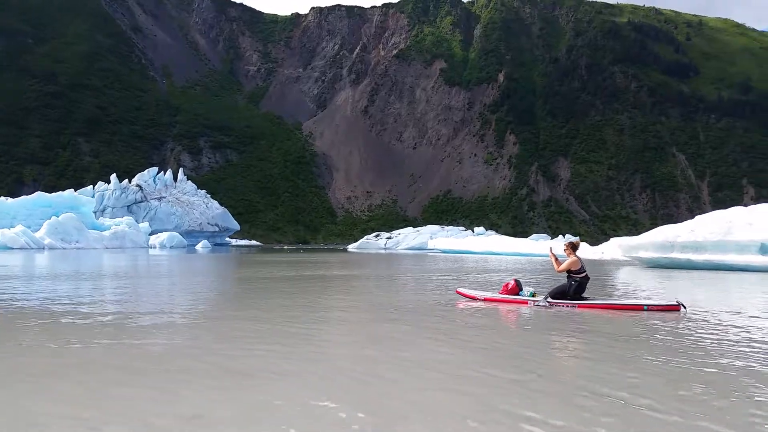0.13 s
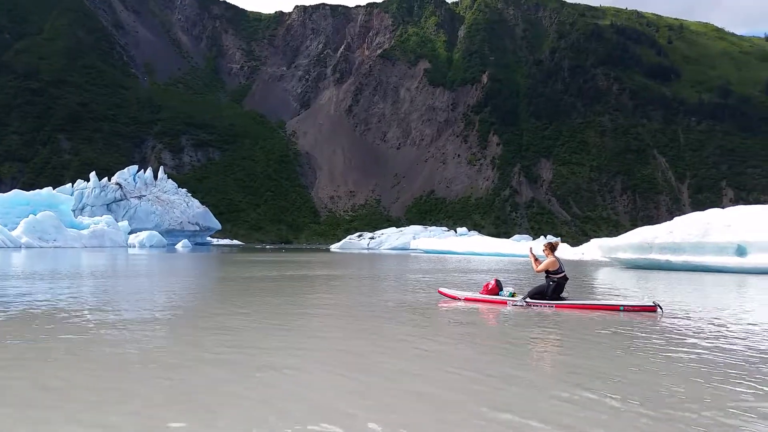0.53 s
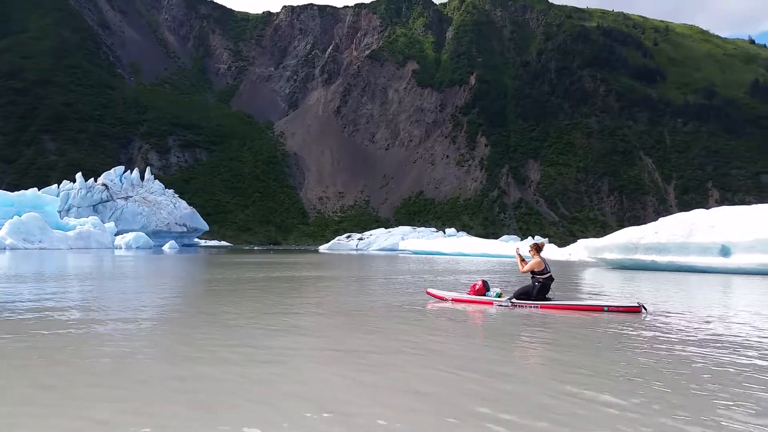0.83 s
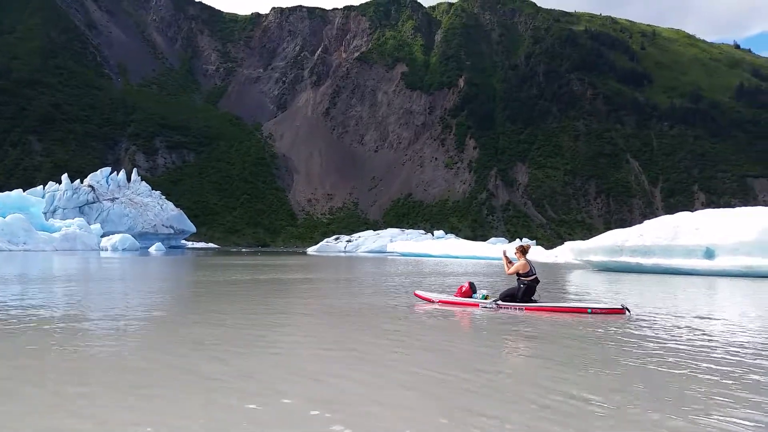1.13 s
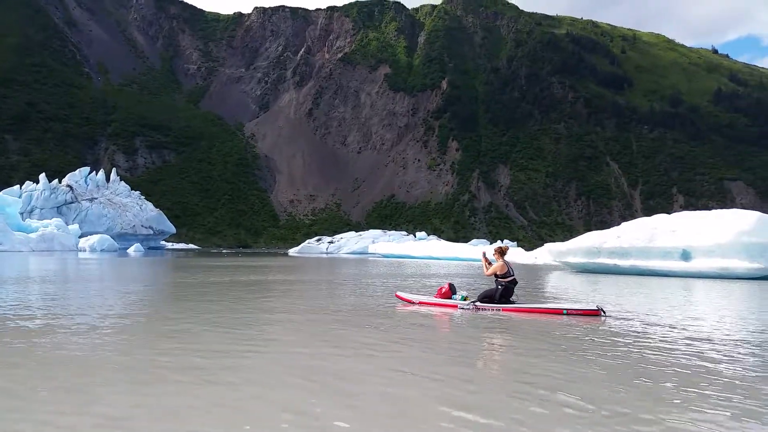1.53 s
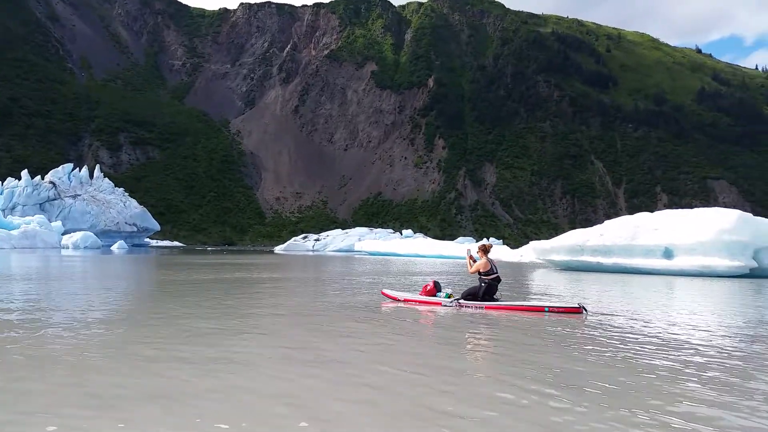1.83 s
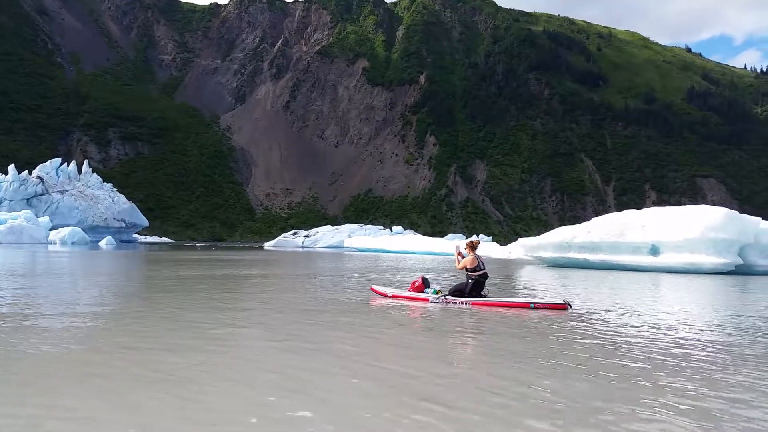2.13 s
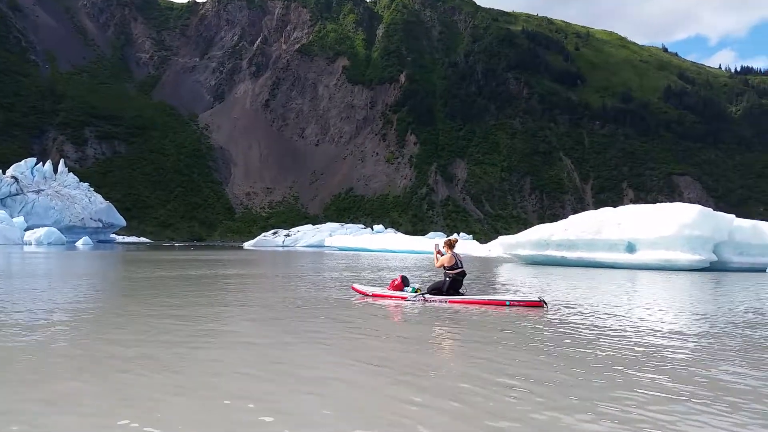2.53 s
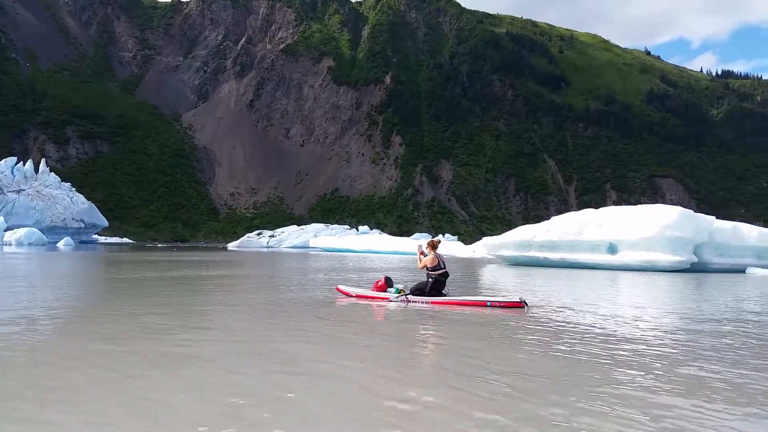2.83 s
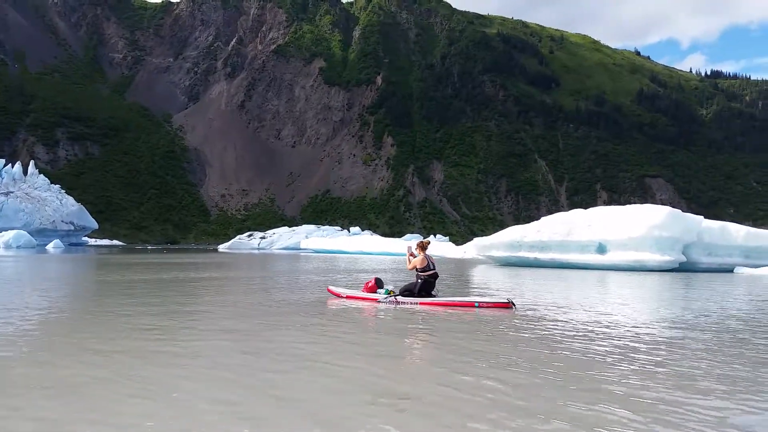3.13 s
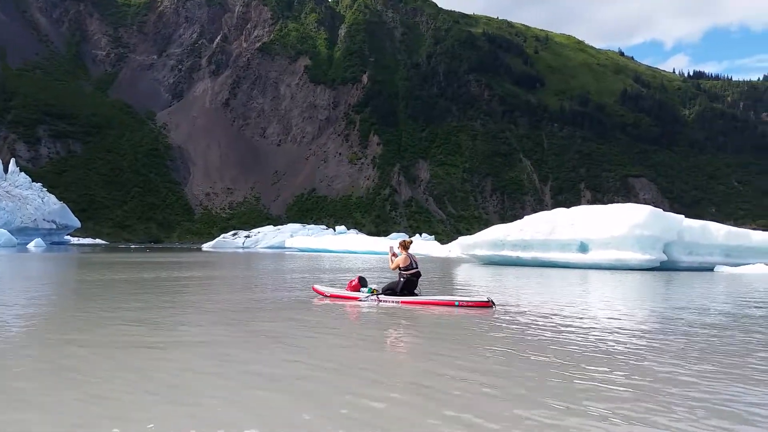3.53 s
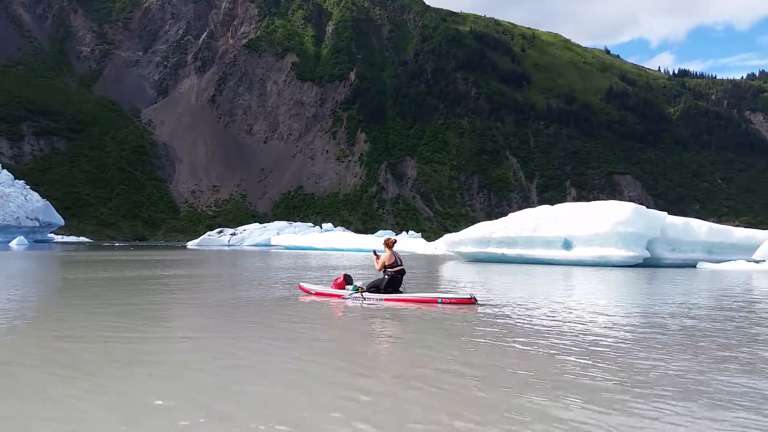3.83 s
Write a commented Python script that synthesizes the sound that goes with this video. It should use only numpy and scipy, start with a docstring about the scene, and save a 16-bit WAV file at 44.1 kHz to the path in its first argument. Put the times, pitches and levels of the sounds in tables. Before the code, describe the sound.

Wind rumble strikes an exposed stereo microphone outdoors, left and right fluttering independently. Very hard low pops hit the left at about 0.06 and 0.16 s, with lesser ones near 0.56, 1.6 and 2.6 s. Busy gusts until 1.4 s give way to weaker, scattered puffs, nearly dying by 4 s. Underneath is soft distant water hiss, a small drip at 0.5 s, and barely audible later drips and ice ticks.

```python
"""Gusts on a glacial lake

Light gusts buffet the two ports of a small camera's microphone out on a calm glacial lake.
Each port has its own rumble of shaped noise that reaches higher as the gust grows; hard pops hit the left.
Underneath lie a soft hiss of distant water (noise), drips (short rising tones) and ticks (treble
noise bursts) of melting ice, and a faint whistle (a gliding sine)."""
import sys
import numpy as np
from scipy import signal
from scipy.io import wavfile
from scipy.ndimage import uniform_filter1d

SR = 44100
rng = np.random.default_rng(int(sys.argv[2]) if len(sys.argv) > 2 else 0)


def invert_db(x):
    """Field ratio 10**(x/20) for x, a level in decibels (scalar or array-like)."""
    u = np.asarray(x, float) / 20
    return 10 ** u


def wav_record(signal):
    """Record a signal, one row per channel, as 16-bit PCM in the file named by sys.argv[1]."""
    frames = np.transpose(np.atleast_2d(signal))
    bounded = np.clip(frames, -1, 1)
    # unit amplitude maps onto the largest positive 16-bit level
    quanta = np.round(bounded * 32767).astype(np.int16)
    wavfile.write(sys.argv[1], SR, quanta)


N = 176400  # length in samples: 4 s

# hiss of distant water as each port colours it: pitch_hz, left_db_per_hz, right_db_per_hz
WATER_COLOUR = [(250, -81.5, -82), (520, -88, -90), (1000, -93, -96), (1310, -96.5, -102),
                (2120, -101, -103), (2450, -94.5, -106), (3710, -93, -110), (4000, -102, -113),
                (4548, -86.5, -111), (5010, -89, -115), (6033, -110, -125), (6540, -131, -132),
                (9900, -131, -130), (10670, -126, -123), (11870, -115, -112), (15800, -112, -110)]
# slow change in hiss level, fading at the end: time_s, change_db
WATER_FADE = [(0, 1), (2.3, 0), (3.7, -2.5), (4.0, -6.5)]
# path of the faint whistle: time_s, pitch_hz, level_db (peak, before panning)
WHISTLE_PATH = [(.36, 377, -58), (.415, 950, -62), (.45, 943, -67), (.55, 1005, -70)]
# ticks of melting ice: start_s, level_db (burst rms before its envelope and panning), centre_hz
ICE_TICKS = [(.897, -61, 14200), (1.3595, -60.5, 12100), (2.849, -65, 14500)]
# drips of melting ice: start_s, level_db (peak before panning), pitch_hz (at the loudest moment)
ICE_DRIPS = [(0.522, -45.5, 2010), (1.873, -56.5, 1640), (2.005, -56.5, 1680), (3.034, -56, 2030),
             (3.257, -69, 1460), (3.812, -66, 1490)]
# single hard eddies on the left port: start_s, level_db (scale of the swing before rounding), pitch_hz
HARD_EDDIES = [(0.064, -1, 150), (.161, -4.5, 90), (.563, -12.5, 245), (1.613, -17, 174),
               (2.608, -14.5, 63.4)]
# buffeting at each port, before lumps and band limits: time_s, level_db
LEFT_GUSTS = [(0.0, -46), (0.13, -29), (0.18, -14), (0.28, -39), (0.31, -26), (0.38, -45), (0.44, -27.5),
              (0.49, -37.5), (0.54, -19), (0.61, -29.5), (0.66, -21), (0.78, -23.5), (0.82, -19),
              (0.88, -23), (0.92, -36), (1.03, -20.5), (1.075, -28), (1.11, -21.5), (1.18, -28.5),
              (1.25, -17.5), (1.34, -40.5), (1.37, -27), (1.51, -28.5), (1.56, -42.5), (1.62, -26.5),
              (1.71, -40.5), (1.74, -26), (1.82, -30), (1.86, -34.5), (1.97, -34.5), (2.02, -49),
              (2.09, -31.5), (2.22, -33), (2.24, -40.5), (2.36, -28.5), (2.46, -53), (2.58, -40),
              (2.61, -29), (2.64, -31), (2.71, -27.5), (2.87, -53.5), (2.95, -44.5), (3.04, -37.5),
              (3.07, -23), (3.12, -44), (3.21, -38), (3.25, -59), (3.29, -33.5), (3.36, -29), (3.41, -36.5),
              (3.66, -34.5), (3.73, -63), (3.84, -42.5), (3.99, -70)]
RIGHT_GUSTS = [(0.0, -26), (0.18, -25.5), (0.28, -45.5), (0.35, -29), (0.44, -22.5), (0.67, -49.5),
               (0.82, -42), (0.9, -23), (0.97, -47.5), (1.04, -24.5), (1.1, -49), (1.23, -33), (1.36, -49),
               (1.46, -36.5), (1.62, -49.5), (1.99, -25), (2.14, -35.5), (2.22, -25.5), (2.38, -36.5),
               (2.45, -44), (2.53, -40.5), (2.58, -28), (2.64, -39.5), (2.73, -33.5), (2.79, -36),
               (2.88, -29), (3.01, -38.5), (3.15, -29), (3.26, -60.5), (3.33, -42), (3.52, -53), (3.6, -30),
               (3.64, -58), (3.7, -34.5), (3.76, -55.5), (3.88, -34), (3.99, -57.5)]
# shape of the eddy spectrum in a strong gust, before it slides: pitch_hz, relative_db_per_hz
EDDY_SPECTRUM = [(15, -4.5), (40, -15.5), (100, 3.5), (200, -4), (350, -24), (550, -36.5), (800, -52),
                 (1200, -67)]


def evened(x):
    """Scales to an rms of 1."""
    return x / np.sqrt(np.mean(x ** 2) + 1e-20)


def curve(points, t):
    """Reads (time, value) rows at times t, in straight lines."""
    return np.interp(t, *np.transpose(points))


def smooth(x, size, axis=-1):
    """Two moving averages in a row."""
    size = max(int(size), 1)
    once = uniform_filter1d(x, size, axis)
    return uniform_filter1d(once, size, axis)


def spectrum_at(hz, points_hz, points_db):
    """Reads a spectrum in dB along a logarithmic pitch axis."""
    return np.interp(np.log(hz + 1), np.log(points_hz + 1), points_db)


def noise(gain, size, hop):
    """Noise whose short-time spectra (frames x bins) have the given gain."""
    z = rng.standard_normal(gain.shape) + 1j * rng.standard_normal(gain.shape)
    _, x = signal.istft((z * gain).T, nperseg=size, noverlap=size - hop)
    return x[:N]


def add(mix, start_s, sound, pan_db):
    """Mixes a short sound in; pan_db is how far left stands above right."""
    part = mix[:, round(start_s * SR):][:, :len(sound)]
    sides = invert_db([[pan_db / 2], [-pan_db / 2]])[:len(mix)]
    part += sound[:part.shape[1]] * sides


def distant_water(size=512, hop=128):
    """Smooth wash: independent noise at each port, with faint patches drifting in time and pitch."""
    patch_db = 0.23  # rms
    t = np.arange(N // hop + 5) * hop / SR
    hz = np.fft.rfftfreq(size, 1 / SR)
    points_hz, *ports = np.transpose(WATER_COLOUR)
    fade_db = curve(WATER_FADE, t)[:, None]
    out = []
    for port_db in ports:
        grain = rng.standard_normal((len(t), len(hz)))
        patches = evened(smooth(smooth(grain, 24, 0), 3, 1))
        field_db = spectrum_at(hz, points_hz, port_db) + patch_db * patches
        # white noise sets the scale, so that 0 dB is unit power per Hz
        white = noise(np.ones(field_db.shape), size, hop)
        scale = np.sqrt(SR / 2) / np.std(white)
        out.append(scale * noise(invert_db(field_db + fade_db), size, hop))
    return np.array(out)


def whistle(points):
    """A thin sine whose pitch and level glide from point to point."""
    time_s, pitch_hz, level_db = np.transpose(points)
    t = np.arange(time_s[0], time_s[-1], 1 / SR)
    phase = 2 * np.pi * np.cumsum(np.interp(t, time_s, pitch_hz)) / SR
    return invert_db(np.interp(t, time_s, level_db)) * np.sin(phase)


def ice_tick(level_db, centre_hz):
    """A very short noise burst: two low noises shifted up around a treble pitch, dying exponentially."""
    attack_s, decay_s, width_hz = .0005, .003, 2500
    t = np.arange(0, 5 * decay_s, 1 / SR)
    b, a = signal.butter(2, width_hz / 2, fs=SR)
    low = signal.lfilter(b, a, rng.standard_normal((2, 1500)))[:, -len(t):]
    phase = 2 * np.pi * centre_hz * t
    burst = low[0] * np.cos(phase) + low[1] * np.sin(phase)
    envelope = np.minimum(t / attack_s, 1) * np.exp(-t / decay_s)
    return invert_db(level_db) * evened(burst) * envelope


def ice_drip(level_db, pitch_hz):
    """A small bubble: a few unsteady cycles that swell, rise a little in pitch and die."""
    cycles, glide, wobble_rad = 8, .02, .07  # the wobble is a phase step per sample, before smoothing
    u = np.arange(0, 3 * cycles, pitch_hz / SR) / cycles  # time in units of 8 cycles
    wobble = wobble_rad * np.cumsum(smooth(rng.standard_normal(SR // 20), 17)[:len(u)])
    envelope = (np.e * 2 * u * np.exp(-2 * u)) ** 1.27  # peaks at 1 when u is 0.5
    phase = 2 * np.pi * cycles * u * (1 + glide * (u - 1))
    return invert_db(level_db) * envelope * np.sin(wobble + phase)


def pop(level_db, pitch_hz):
    """A hard eddy: a quick drop of pressure, then a slower swing up, with rounded edges."""
    decay_cycles, onset_cycles, round_s = .9, 0.095, .0011
    u = np.arange(-.2, 3, pitch_hz / SR).clip(0)  # time in cycles, after a short silence
    envelope = np.exp(-(u / decay_cycles) ** 2) * np.minimum(u / onset_cycles, 1)
    swing = envelope * np.sin(2 * np.pi * u ** 0.5)  # the root makes each half swing slower
    return -invert_db(level_db) * smooth(swing, round_s * SR)


def wind(gusts, shift_oct, size=1024, hop=128):
    """Lumpy low turbulence at one port; the eddy spectrum slides up as the gust strengthens."""
    strong_db, slide_oct_per_db = -20, 0.0554  # the spectrum stands as tabled at strong_db
    lump_db, lump_s = 2.3, .007
    steady, steady_s = .7, .03  # share of the noise's own level swings taken out, and over how long
    t = np.arange(N // hop + 9) * hop / SR
    hz = np.fft.rfftfreq(size, 1 / SR)
    lumps = evened(smooth(rng.standard_normal(len(t)), lump_s * SR / hop))
    level_db = curve(gusts, t) + lump_db * lumps

    slide = 2 ** (shift_oct + slide_oct_per_db * (level_db - strong_db))
    points_hz, points_db = np.transpose(EDDY_SPECTRUM)
    gain = invert_db(spectrum_at(hz[None] / slide[:, None], points_hz, points_db))
    gain = gain / np.linalg.norm(gain, axis=1, keepdims=True)  # the same power in every frame
    rumble = evened(noise(gain, size, hop))
    power = smooth(rumble ** 2, steady_s * SR) + 0.001
    rumble = evened(rumble / power ** (steady / 2))

    rumble = rumble * invert_db(np.interp(np.arange(N) / SR, t, level_db))
    band = signal.butter(2, [23, 850], "band", fs=SR, output="sos")
    return signal.sosfiltfilt(band, rumble)


def scene():
    """Layers water, whistle, ticks, drips and pops with the wind at each port."""
    mix = distant_water()
    add(mix, WHISTLE_PATH[0][0], whistle(WHISTLE_PATH), 2)
    for start_s, level_db, centre_hz in ICE_TICKS:
        add(mix, start_s, ice_tick(level_db, centre_hz), -3)
    for start_s, level_db, pitch_hz in ICE_DRIPS:
        add(mix, start_s, ice_drip(level_db, pitch_hz), 2)
    for start_s, level_db, pitch_hz in HARD_EDDIES:
        add(mix[:1], start_s, pop(level_db, pitch_hz), 0)  # left port only
    # the right port's spectrum sits a fifth of an octave lower
    return mix + np.array([wind(LEFT_GUSTS, 0), wind(RIGHT_GUSTS, -0.2)])


def top_cut(x):
    """Nothing passes above the cut-off."""
    return signal.sosfilt(signal.butter(12, 16790, fs=SR, output="sos"), x)


def record(dry):
    """Cuts the treble above a steep edge at 15780 Hz and returns the finished sound."""
    lowpass = signal.firwin(1023, 15780, window=("kaiser", 10), fs=SR)
    mix = signal.oaconvolve(dry, lowpass[None], "same")
    return top_cut(mix)


dry = scene()
out = record(dry)
wav_record(out)
```